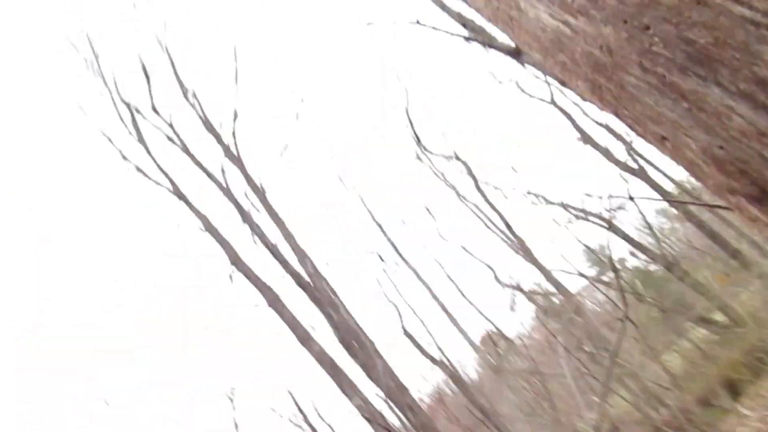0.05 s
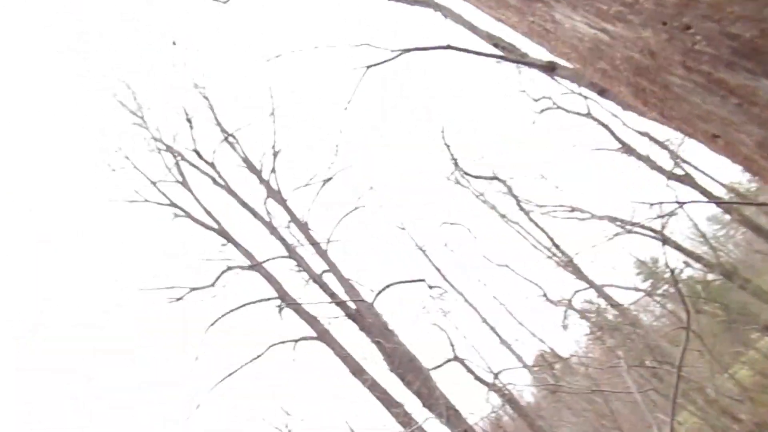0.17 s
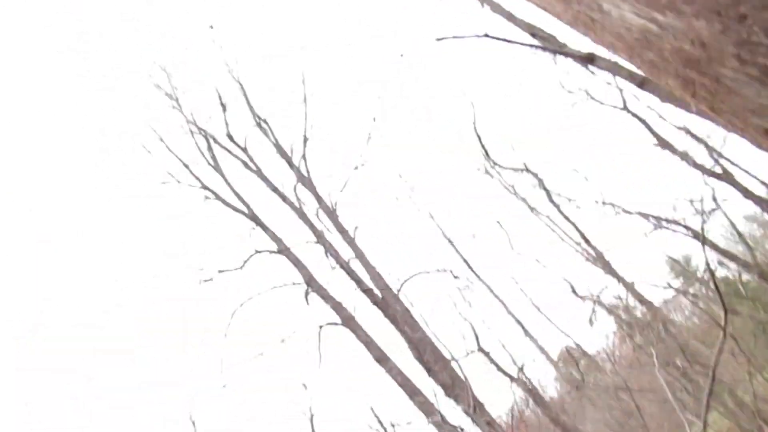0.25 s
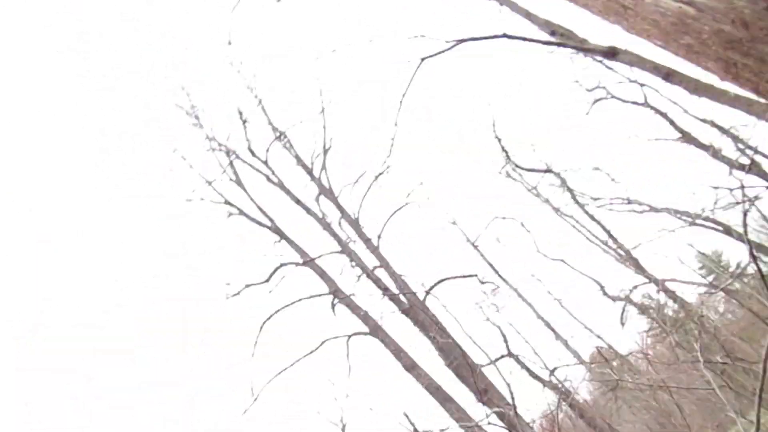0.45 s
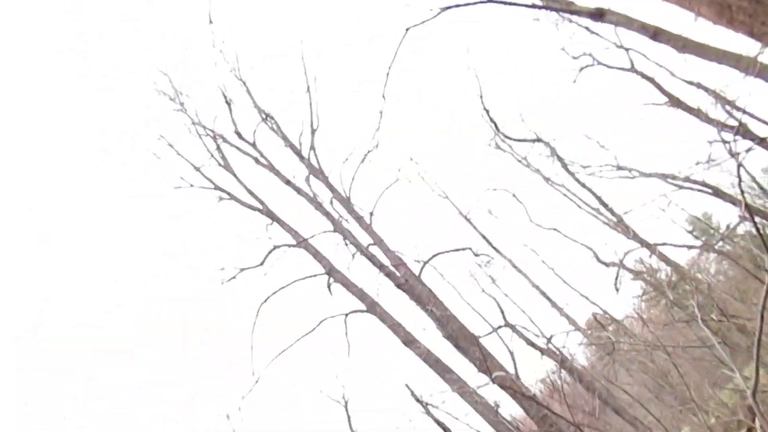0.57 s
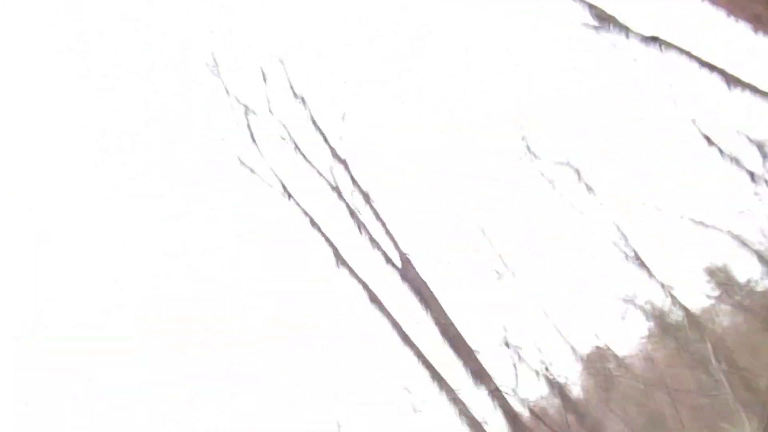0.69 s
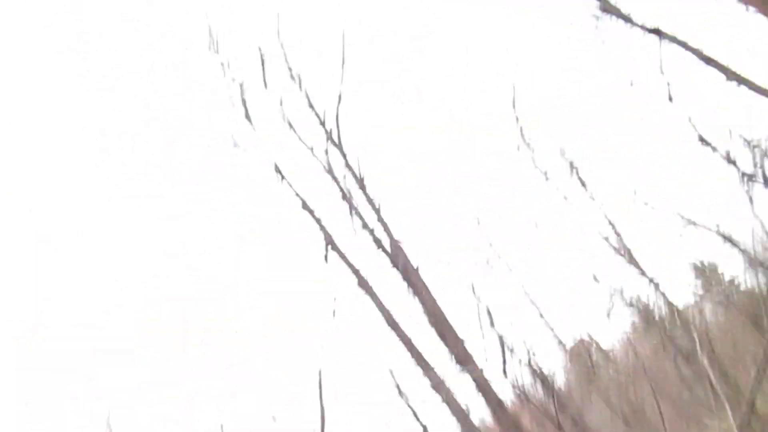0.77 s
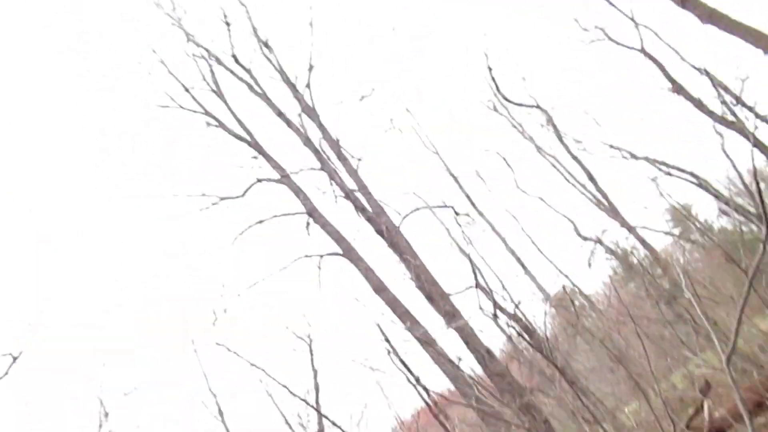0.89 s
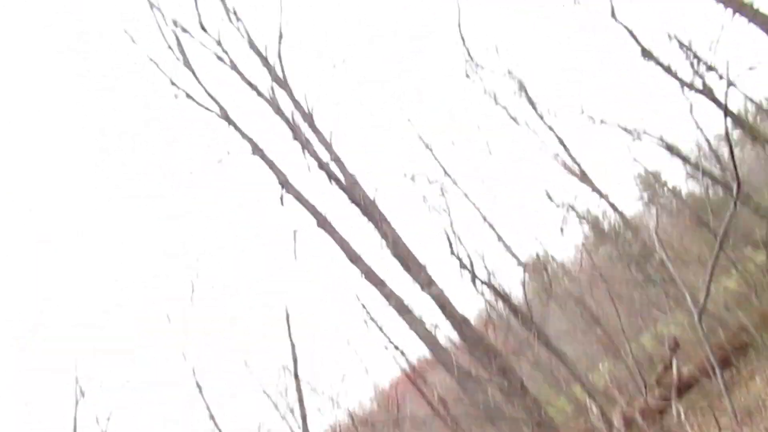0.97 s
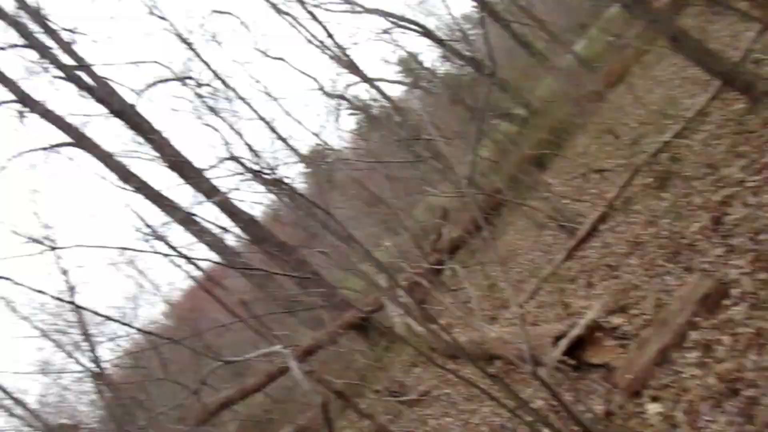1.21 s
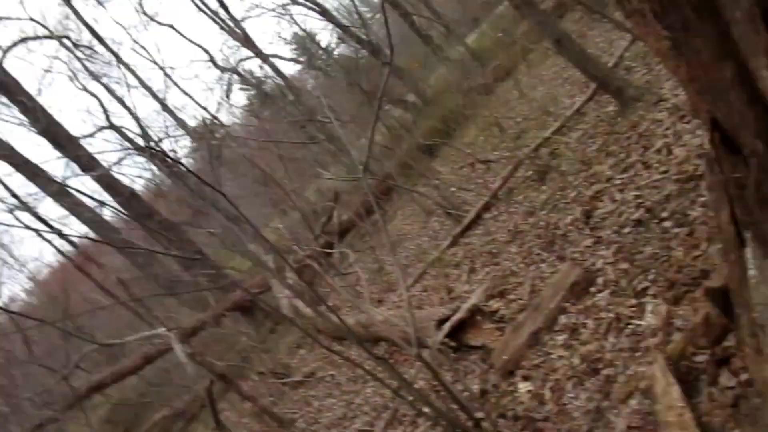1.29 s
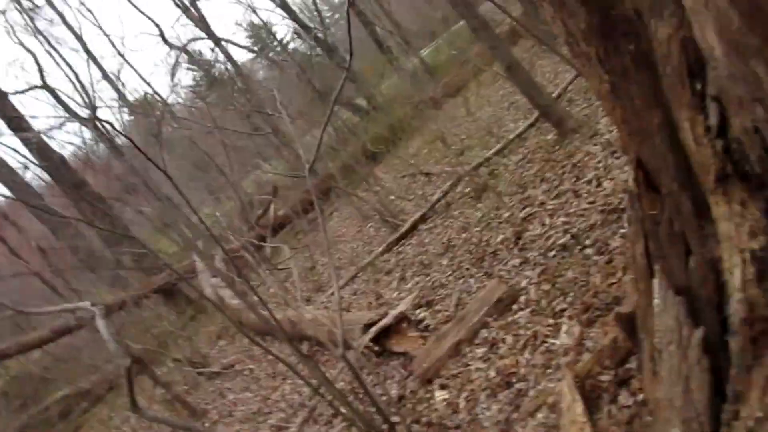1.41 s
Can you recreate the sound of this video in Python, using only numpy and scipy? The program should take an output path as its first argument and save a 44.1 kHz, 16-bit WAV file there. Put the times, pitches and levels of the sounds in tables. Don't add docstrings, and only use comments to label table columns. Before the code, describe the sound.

Wooden twig cracks in short clusters, the second loudest, over soft thumps and quiet leaf litter

```python
import sys
import numpy as np
from scipy import signal
from scipy.fft import rfft, irfft
from scipy.io import wavfile
from scipy.ndimage import uniform_filter1d

SR = 44100
rng = np.random.default_rng(int(sys.argv[2]) if len(sys.argv) > 2 else 0)


def dump_mix(stems):
    frames = np.atleast_2d(stems).T
    limited = np.clip(frames, -1, 1)
    pcm = np.round(limited * 32767).astype(np.int16)
    wavfile.write(sys.argv[1], SR, pcm)


def how_loud(loudness_db):
    steps = np.asarray(loudness_db, float) / 20
    return 10 ** steps


N = 63945
BURST_N = 2048
RING_RISE_S = 0.00012

# f/Hz, density/dB per Hz
SNAP_COLOUR = [(1000, 8), (3000, 1.5), (6000, 1), (9500, -5.5), (12000, -8), (15500, -19.5)]


def colour(x, points):
    p = np.array(points, float)
    f = np.maximum(np.fft.rfftfreq(2048, 1 / SR), 1)
    log_gain = np.interp(np.log(f), np.log(p[:, 0]), p[:, 1]) * np.log(10) / 20
    cepstrum = irfft(log_gain)
    cepstrum[1:1024] *= 2
    cepstrum[1025:] = 0
    return signal.fftconvolve(x, irfft(np.exp(rfft(cepstrum))))[:len(x)]


def unit(x):
    return x / np.sqrt(np.mean(x ** 2))


def walk(rate):
    k = int(SR / rate)
    steps = np.repeat(rng.standard_normal(N // k + 1), k)
    return unit(uniform_filter1d(uniform_filter1d(steps, k), k)[:N])


def modes(table, rise_s):
    t = np.arange(4096) / SR
    ring = np.zeros(len(t))
    for k, (hz, db, t60) in enumerate(table):
        way = (-1) ** (k * (hz > 1500))
        t60 = min(t60, .03 if hz < 1500 else .011)
        ring += way * how_loud(db) * np.sin(2 * np.pi * hz * t) * np.exp(-np.log(1000) * t / t60)
    return ring * (1 - np.exp(-(t / rise_s) ** 2))


def burst(ms):
    tail_s, tail_db = 0.01, -33.5
    t = np.arange(BURST_N) / SR
    env = (1 - np.exp(-t / 0.00018)) * np.exp(-t * 1000 / max(ms, .2))
    env = env + how_loud(tail_db) * np.exp(-t / tail_s)
    return env / np.sqrt(np.sum(env ** 2))


def cracks():
    # t/s, knock level/dB, ring level/dB, snap level/dB, burst/ms
    crack_table = [(.3567, -30.5, -31, -17, 0.6), (.3590, -9.5, -13, -39.5, 0.82),
                   (.3660, -21.5, -44, -27, 2.2), (.3715, -26, -34.5, -18.5, 0.5),
                   (.2610, -34, -25.5, -21.5, 1.0), (.3915, -56.5, -24, -24.5, 5), (.3937, -11, 9, 1, 1.02),
                   (.3975, -27.5, -34.5, -26.5, 1.0), (.4010, -49.5, -3.5, -16.5, 1.4),
                   (.4045, -48.5, -34, -21, 2.0), (.2375, -21, -33, -43.5, 2),
                   (.4268, -20, -43.5, -20, 1.6), (.6764, -7, -8, -11.5, 1.14), (.6805, -22, -38, -26, 1.2),
                   (.6842, -60, -27, -10.5, 2.5), (.6890, -21, -34, -37, 3.7), (.9825, -30.5, -55, -60, 5),
                   (.9922, -10.5, -8.5, -19, 1.46), (.9973, -12, -11.5, -22, 3.6),
                   (1.0020, -59, -19.5, -51, 3.6), (1.0105, -38, -55, -36.5, 15),
                   (1.2195, -32, -38, -56, 4.4), (.3635, -38.5, -29.5, -26, 1.5),
                   (.3685, -40, -37.5, -29, 1.2), (.3830, -49, -35.5, -35, 2),
                   (.4072, -45.5, -35.5, -29, 1), (.4135, -49.5, -40, -37, 2), (.2405, -25, -50, -43, 1.5),
                   (.2650, -67, -35, -35.5, 1.5), (.6925, -26.5, -31, -36, 2), (.9945, -40, -9, -22.5, 1),
                   (1.0005, -28.5, -18.5, -50, 1), (1.0065, -33, -41, -48, 1.5)]
    # f/Hz, level/dB, t60/s
    knock_first = [(385.5, 4, 0.018), (541, 0.5, 0.015), (804, -3.5, 0.0093), (1300, -4.5, 0.018)]
    knock_thin = [(435, 3.5, 0.011), (704, 5.5, 0.0076), (1205, -6, 0.011), (4400, 1.5, 0.00633)]
    knock_thick = [(407, 3.5, 0.021), (528, 0.5, 0.017), (904, -3.5, 0.0063), (1274, -3, .012),
                   (1383, -10.5, 0.011)]
    # f/Hz, level/dB, t60/s
    ring_first = [(1300, -18, 0.016), (1791, -3.5, 0.0028), (2400, -5.5, 0.0043), (3050, -6.5, 0.0068),
                  (4540, -16.5, 0.0041), (5830, -19, 0.0043)]
    ring_thin = [(1247, -7.5, 0.01313), (2030, -22, 0.0062), (2860, 2.5, 0.01), (3030, -3.5, 0.0061),
                 (4400, -10.5, .007), (4920, -5, 0.0083), (6070, -5.5, 0.0038), (8300, -30, 0.0031)]
    ring_thick = [(1300, -5, 0.0082), (1850, -11.5, 0.0083), (2170, -4, .005), (2450, -9, 0.0099),
                  (2980, 1, 0.006), (3380, -18, 0.0037), (4170, -8, .004), (5460, -18, .004)]
    # f/Hz, density/dB per Hz
    snap_thin = [(1000, -2), (2000, -2), (3000, 4), (3700, -6.5), (6000, -2.5), (9000, -2.5),
                 (13000, -11.5), (15000, -24.5)]
    snap_thick = [(1000, 13.5), (3000, 13), (5800, 6), (7000, -0.5), (12000, -5.5), (15000, -19)]
    knock_rise_s, splinter_share = 0.00049, .55
    twigs = ((knock_first, ring_first, SNAP_COLOUR, knock_rise_s, -1),
             (knock_thin, ring_thin, snap_thin, knock_rise_s / 2, 1),
             (knock_thick, ring_thick, snap_thick, knock_rise_s, -1))
    breaks_until_s = [.6, .8, 2]

    drive = np.zeros((len(twigs), 3, N + BURST_N))
    for s, knock_db, ring_db, snap_db, ms in crack_table:
        splinters = rng.standard_normal((3, BURST_N)) * burst(ms)
        splinters[:2] *= splinter_share
        splinters[:2, 0] = 1
        levels = how_loud([[knock_db], [ring_db], [snap_db + 15.5]])
        i, twig = int(s * SR), np.searchsorted(breaks_until_s, s)
        drive[twig, :, i:i + BURST_N] += splinters * levels

    out = np.zeros(N)
    for (blow, shake, hiss), (knock, ring, snap, rise_s, way) in zip(drive, twigs):
        out += way * signal.fftconvolve(blow, modes(knock, rise_s))[:N]
        out += signal.fftconvolve(shake, modes(ring, RING_RISE_S))[:N]
        out += colour(hiss[:N], snap)
    return out


def ticks():
    # t/s, pitch f/Hz, ping level/dB, snap level/dB, burst/ms
    tick_table = [(0.046, 853, -32, -34, 0.46), (0.062, 2060, -34, -43, 1.2),
                  (0.242, 1300, -30.5, -37, 7.3), (.2570, 4900, -36, -35, 1), (0.2911, 3130, -44, -55, 1.5),
                  (0.2984, 8800, -46, -77, 1.5), (0.3795, 5600, -26, -18, 2.7),
                  (.4080, 1555, -20.5, -38, 1.6), (0.4233, 2976, -10.5, -22.5, 1.3),
                  (.4480, 5590, -48, -41, 4.4), (.6200, 725, -39, -32, 11), (.6320, 515, -36, -28.5, 2.5),
                  (0.647, 6500, -37, -38.5, 3.3), (0.6582, 5100, -38.5, -32, 8.5),
                  (.7030, 2400, -47, -35, 0.89), (.8580, 710, -41.5, -52, 2), (0.909, 4540, -46.5, -45, 10),
                  (1.0920, 4400, -44.5, -49.5, 4.0), (1.1560, 790, -42, -76, 3.2),
                  (1.3640, 5640, -50, -42, 3), (1.411, 3090, -52, -37.5, 27), (.3566, 6950, -12, -27, 0.18),
                  (.3942, 6380, 0, -39.5, .8), (.4222, 2970, -31, -17, 1.1), (.4330, 9120, -40.5, -45, 1),
                  (.2432, 13500, -45, -46, 1), (.2685, 10500, -38.5, -57, 1.4),
                  (.6858, 13400, -23, -19.5, 0.46), (.6860, 9500, -20, -45, 0.81),
                  (.6890, 9000, -28, -25, 0.86), (.6985, 5000, -46, -45, 1.1), (.7098, 2480, -51, -34, 1.5),
                  (.9315, 9000, -50, -47, 2.3), (1.303, 3200, -50.5, -49, 3.8),
                  (.2385, 770, -26.5, -66, 9.5), (1.2202, 3000, -33.5, -51, 1.4),
                  (1.2205, 1300, -33.5, -58, 5.4), (1.411, 6730, -49.5, -64, 53)]
    ping_cycles = 19
    ping, snap = np.zeros((2, N + 8192))
    for s, hz, ping_db, snap_db, ms in tick_table:
        splinters = rng.standard_normal((2, BURST_N)) * burst(ms)
        blow = splinters[0] + signal.unit_impulse(BURST_N) * 2 / max(ms, 2)
        note = signal.fftconvolve(blow, modes([(hz, 0, ping_cycles / hz)], RING_RISE_S))
        i = int(s * SR)
        ping[i:i + len(note)] += how_loud(ping_db) * note / np.abs(note).max()
        snap[i:i + BURST_N] += splinters[1] * how_loud(snap_db + 13)
    return ping[:N] + colour(snap[:N], SNAP_COLOUR)


def thuds():
    # t/s, peak level/dB, pitch f/Hz, t60/s, direction
    thud_table = [(0.225, -18, 41.5, 0.086, 1), (0.236, -23, 103.5, 0.13, -1), (0.264, -6, 67.6, 0.032, 1),
                  (.292, -48.5, 70, 0.067, -1), (0.309, -23, 58, 0.084, -1), (.349, -14.5, 124, 0.022, -1),
                  (0.363, -18.5, 88, 0.063, 1), (0.374, -4, 93.6, 0.065, 1), (0.398, -16, 78.8, 0.064, 1),
                  (0.426, -29.5, 69.6, 0.11, 1), (0.619, -23, 58, 0.04, 1), (0.635, -19, 61.4, 0.064, 1),
                  (0.6758, -9.5, 126.5, 0.0413, -1), (0.685, -18.5, 57.4, 0.095, -1),
                  (.997, -19, 63, 0.093, -1), (1.22, -40.5, 54.8, 0.13, 1), (1.302, -38.5, 59.4, 0.16, -1),
                  (1.408, -35.5, 50, 0.41, -1)]
    rise_cycles = 0.15
    out = np.zeros(N)
    for s, db, hz, t60, way in thud_table:
        t = np.maximum(np.arange(N) / SR - s, 0)
        env = (1 - np.exp(-t * hz / rise_cycles)) * np.exp(-np.log(1000) * t / t60)
        out += np.sign(way) * how_loud(db + 4.5) * env * np.sin(2 * np.pi * hz * t)
    return out


def squeaks():
    # start t/s, length/s, start f/Hz, end f/Hz, level/dB
    squeak_table = [
        (0.06, 0.038, 7500, 7960, -53),
        (0.14, 0.031, 8700, 10500, -57.5),
        (0.182, 0.0054, 3230, 3120, -44.5),
        (0.193, .007, 5900, 5750, -57),
        (0.195, .014, 5070, 4580, -54),
    ]
    out = np.zeros(N)
    rough = how_loud(1.8 * walk(300))
    for s, length, from_hz, to_hz, db in squeak_table:
        u = np.clip((np.arange(N) / SR - s) / length, 0, 1)
        hz = to_hz + (from_hz - to_hz) * np.exp(-u / 0.17)
        out += how_loud(db) * np.sin(np.pi * u) * np.sin(2 * np.pi * np.cumsum(hz) / SR)
    return out * rough


def litter():
    # t/s, rustle level/dB, scrape level/dB, buffeting level/dB
    stir = [(0, -43, -61, -34.5), (0.068, -41.5, -49, -33), (0.091, -51.5, -47, -37.5),
            (.105, -44.5, -67.5, -44), (0.138, -49.5, -70, -42), (.2, -50, -71, -39.5),
            (0.332, -48.5, -75, -38), (.45, -64, -80, -56), (0.568, -65.5, -76, -59.5),
            (0.611, -53.5, -62, -50), (0.742, -60.5, -79.5, -53), (.83, -60.5, -66.5, -56.5),
            (0.901, -57.5, -55, -59), (.96, -51, -61.5, -52), (1.04, -55.5, -63.5, -59),
            (1.25, -55.5, -66.5, -50.5), (1.39, -60.5, -77.5, -52.5), (1.421, -59, -61, -54)]
    # f/Hz, density/dB per Hz
    rustle_colour = [(150, -10), (361, -13), (514, -1), (601, -4), (2550, -13), (4860, -15.5),
                     (14500, -33.5), (16000, -47)]
    scrape_colour = [(1500, -13.5), (3500, 2.5), (6000, -2.5), (9000, -2.5), (14000, -5)]
    buffet_colour = [(20, -6.5), (55, 3), (110, -2), (200, -8), (400, -12), (900, -47.5)]
    crackle_per_s, crackle_spread_db, crackle_db = 490, 7.5, -3.5

    happens, side, size = rng.random((3, N))
    size_db = np.minimum(-crackle_spread_db * np.log(1 - size), 9)
    grains = (happens < crackle_per_s / SR) * np.sign(side - .5) * how_loud(size_db)
    raw = colour(rng.standard_normal(N) + how_loud(crackle_db) * unit(grains), rustle_colour)
    low = signal.sosfilt(signal.butter(2, 1500, fs=SR, output="sos"), raw)
    rustle = unit(low * how_loud(3.4 * walk(15.84)) + (raw - low) * how_loud(0.5 * walk(27)))
    scrape = unit(colour(rng.standard_normal(N), scrape_colour)) * how_loud(2.5 * walk(60))
    buffet = unit(colour(rng.standard_normal(N), buffet_colour)) * how_loud(2.5 * walk(25))

    t = np.arange(N) / SR
    s, *levels_db = np.transpose(stir)
    out = np.zeros(N)
    for layer, db in zip((rustle, scrape, buffet), levels_db):
        out += layer * how_loud(np.interp(t, s, db))
    return out


def scene():
    return (cracks() + ticks() + thuds() + squeaks() + litter())[None]


def band_limit(x):
    return signal.sosfilt(signal.butter(12, 16820, fs=SR, output="sos"), x)


def record(dry):
    bass_cut = signal.butter(1, 15, "high", fs=SR, output="sos")
    x = np.clip(signal.sosfilt(bass_cut, dry), -.93, .93)
    top_cut = signal.ellip(9, .1, 50, 14800, fs=SR, output="sos")
    body = signal.sosfiltfilt(top_cut, x)
    mix = body + how_loud(-25.5) * (x - body)
    return band_limit(mix)


dry = scene()
out = record(dry)
dump_mix(out)
```